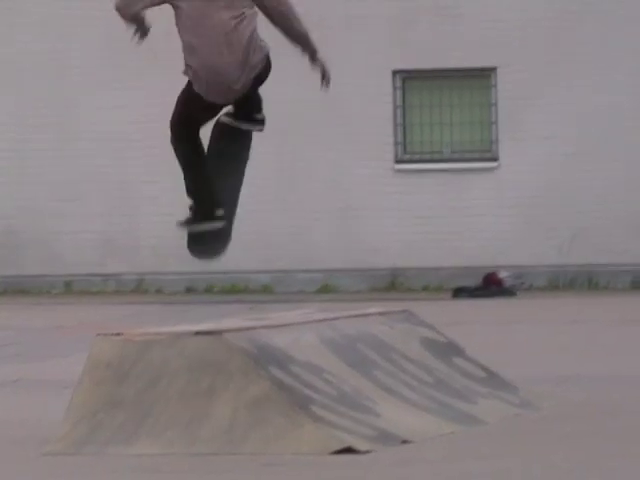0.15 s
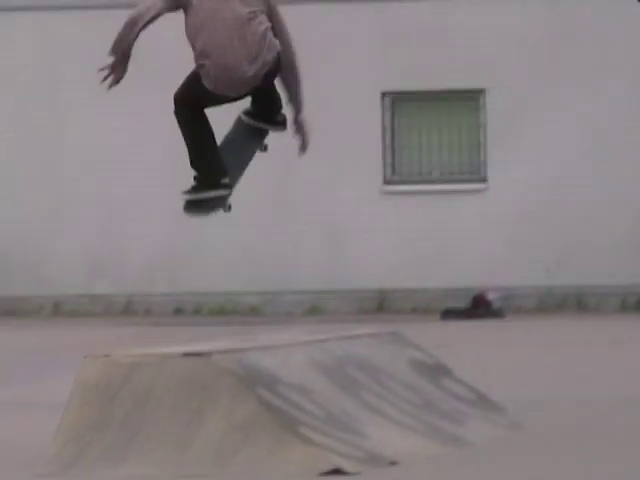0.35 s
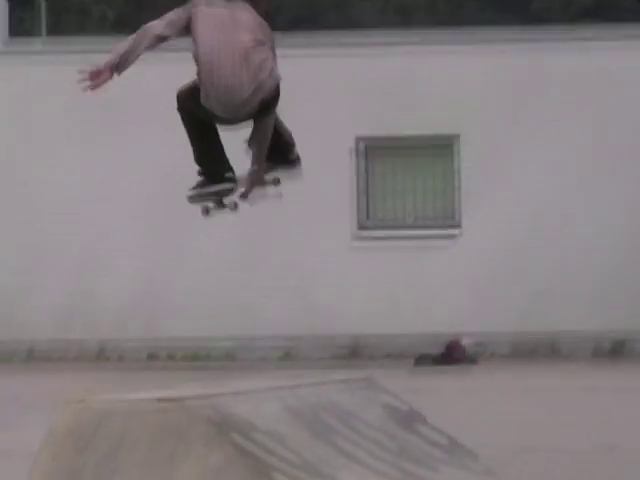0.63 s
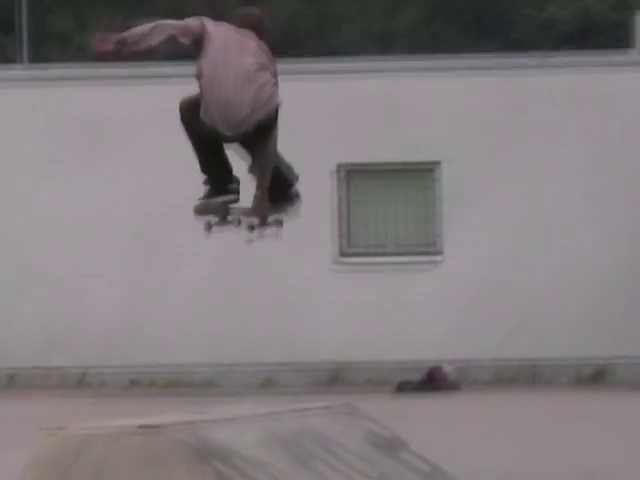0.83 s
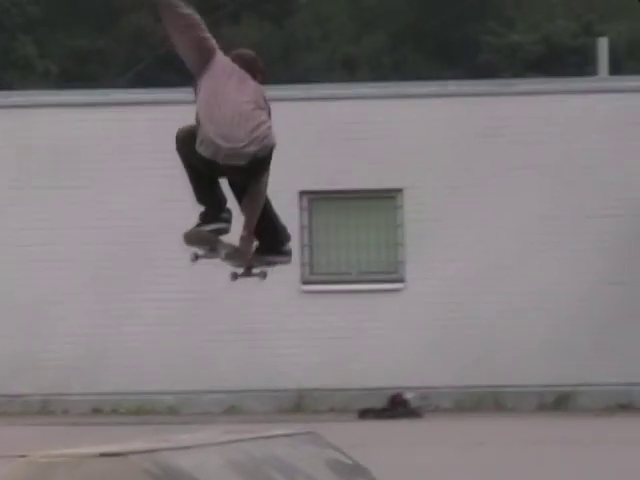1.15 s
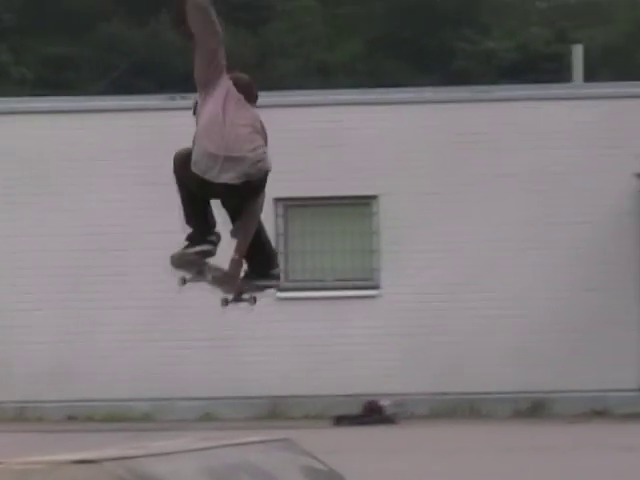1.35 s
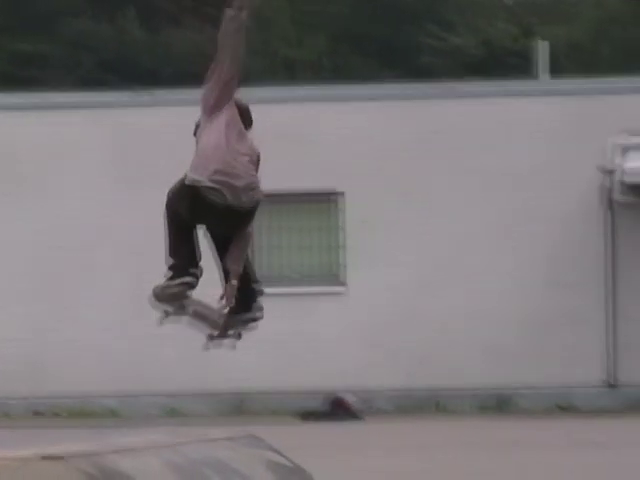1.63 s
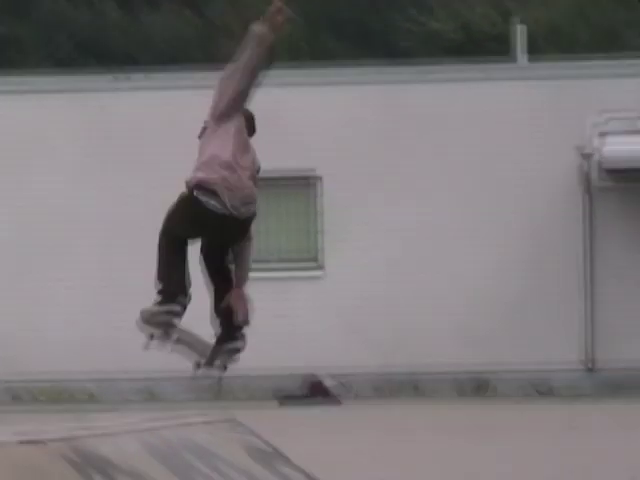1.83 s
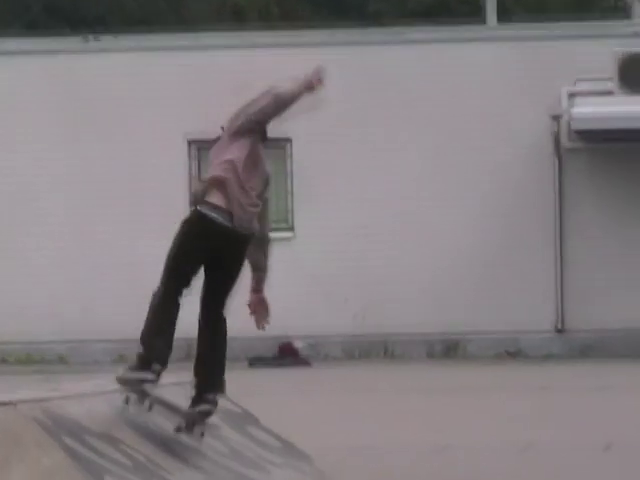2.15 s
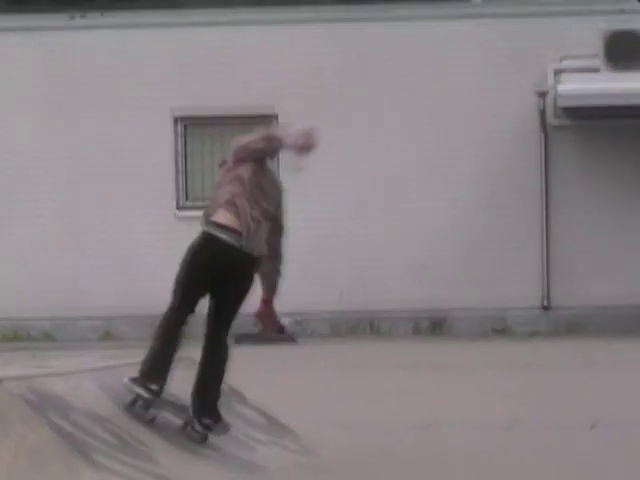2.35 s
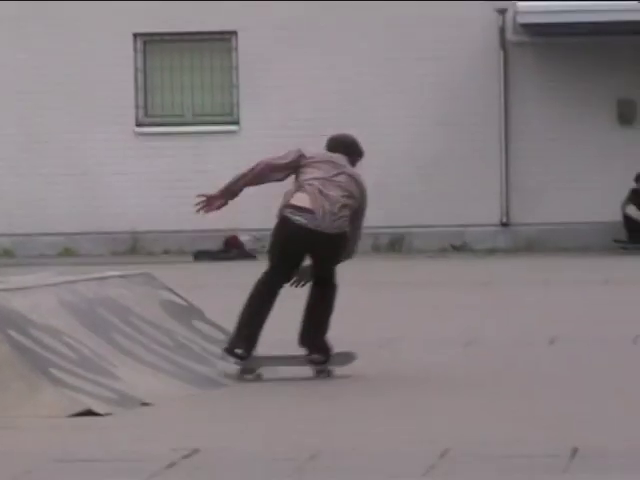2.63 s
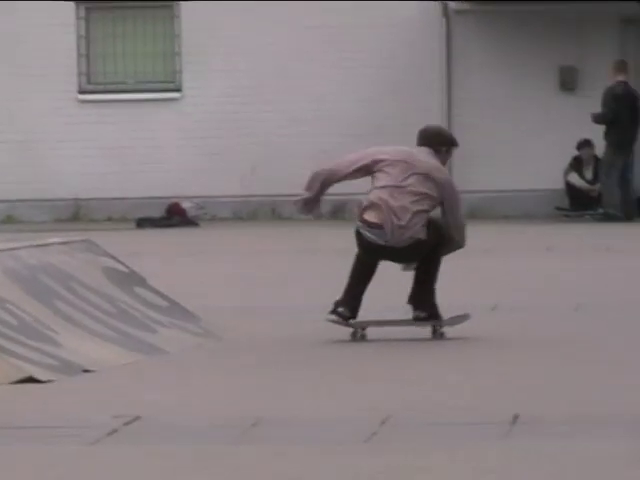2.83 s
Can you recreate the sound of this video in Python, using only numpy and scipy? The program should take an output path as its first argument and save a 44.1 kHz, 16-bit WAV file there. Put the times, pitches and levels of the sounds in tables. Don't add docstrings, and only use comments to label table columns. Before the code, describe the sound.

A skateboard in slow motion, close and loud: low dull rumble, hard wooden clacks, heavy thumps and loose metal rattles, overloading at the peaks, then abruptly quiet far rolling with light clicks in an open paved yard.

```python
import sys
import numpy as np
from scipy import signal
from scipy.fft import rfft, irfft, next_fast_len
from scipy.io import wavfile
from scipy.ndimage import map_coordinates

SR = 44100
rng = np.random.default_rng(int(sys.argv[2]) if len(sys.argv) > 2 else 0)


def generate_wav(sig):
    pcm = np.round(np.clip(np.atleast_2d(sig).T, -1, 1) * 32767).astype(np.int16)
    wavfile.write(sys.argv[1], SR, pcm)


def gain_from_db(level_db):
    decades = np.asarray(level_db, float) / 20
    return 10 ** decades


N = 132300


def unit(x):
    return x / np.sqrt(np.mean(x ** 2) + 1e-20)


def along(points, hz):
    f, v = np.transpose(points)
    return np.interp(np.log(hz + 1), np.log(f + 1), v)


def curves(rows):
    s, *columns = np.transpose(rows)
    return [np.interp(np.arange(N) / SR, s, column) for column in columns]


def wobble(rate):
    knots = rng.standard_normal(int(N * 200 / SR) + 4)
    return map_coordinates(knots, [np.arange(N) * min(rate, 200) / SR])


def filtered(x, response):
    n = x.shape[-1]
    m = next_fast_len(n + 8192)
    return irfft(rfft(x, m) * response(np.fft.rfftfreq(m, 1 / SR)), m)[..., :n]


def body(modes):
    def response(f):
        total = 0
        for k, (hz, width, db) in enumerate(modes):
            damping = 1j * f * width
            total = total + (-1) ** k * gain_from_db(db) * damping / (hz * hz - f * f + damping)
        return total
    return response


def rush(spectrum, alike, gritty_db):
    pair = rng.standard_normal((2, N)) * gain_from_db(gritty_db * wobble(150))

    def mid_side(hz):
        turn = np.arccos(np.clip(along(alike, hz), -1, 1)) / 2
        return gain_from_db(along(spectrum, hz)) * np.array([np.cos(turn), np.sin(turn)])
    mid, side = filtered(pair, mid_side)
    return unit(np.array([mid + side, mid - side]))


def burst(response, t60, rise_s, push=1):
    t = np.arange(SR // 2) / SR
    push_level = 2.65 * push * np.sqrt(0.00023 / rise_s)
    first = push_level * np.exp(1 - t / rise_s) * t / rise_s
    scrape_rise_s = 1 / SR if push else rise_s
    scrape = rng.standard_normal(len(t)) * gain_from_db(-60 * t / t60) * (1 - np.exp(-t / scrape_rise_s))
    x = filtered(first + scrape, response) * gain_from_db(-30 * t / t60)
    return x / np.sqrt(np.mean(x[:SR // 50] ** 2))


def add(track, s, x):
    track[round(s * SR):][:len(x)] += x


def lean_left(x, db):
    return x * gain_from_db([[db / 2], [-db / 2]])


METAL_LEFT_DB = 5.5

# start_s [s], load_db [dB], grit_db [dB]
ROLL = [(0, -18.5, -38.5), (.2, -17, -37.5), (.4, -14.5, -41), (.58, -13.5, -37.5), (.72, -18.5, -38),
        (.88, -18.5, -39), (.97, -18.5, -33), (1.1, -20, -39.5), (1.3, -16.5, -36.5), (1.47, -16, -38),
        (1.78, -16, -40), (1.93, -21, -43.5), (2.03, -14, -41), (2.12, -17.5, -36.5), (2.25, -17, -36.5),
        (2.34, -13, -37), (2.43, -22, -36), (2.52, -10, -35.5)]
# pitch_hz [Hz], level_db [dB per Hz]
RUMBLE = [(15, -38), (25, -10.5), (85, -1.5), (165, -5), (210, -2), (292, -9), (377, -13), (502, -13.5),
          (900, -26), (1170, -24), (1980, -120)]
# pitch_hz [Hz], level_db [dB per Hz]
GRIT = [(350, -31.5), (600, 0.5), (1120, -7), (1610, -5.5), (2200, -14), (3150, -20), (3700, -24.5),
        (4200, -33)]
# pitch_hz [Hz], left_right_likeness [-1..1]
NEAR_ALIKE = [(60, 1), (160, 1), (400, 0.88), (1040, 0.93), (2700, 0.2)]


def wheels():
    load_db, grit_db = curves(ROLL)
    shared = wobble(17.0)
    rumble_lumps = gain_from_db(1.9 * shared + 0.42 * wobble(40))
    rumble = unit(rumble_lumps * rush(RUMBLE, NEAR_ALIKE, gritty_db=-0.5))
    grit_lumps = gain_from_db(1.1 * shared + 0.59 * wobble(30.35))
    grit = unit(grit_lumps * rush(GRIT, NEAR_ALIKE, gritty_db=1.5))
    buzz = filtered(grit, lambda hz: 1 / (1 + (hz / 2000) ** 6))
    hiss = grit - buzz
    buzz_db = (load_db + grit_db) / 2 - 5.5
    hiss_db = 2.2 * (grit_db + 36.5) - 30
    bright = gain_from_db(buzz_db) * buzz + gain_from_db(hiss_db) * hiss
    return gain_from_db(load_db) * rumble + lean_left(bright, METAL_LEFT_DB)


# start_s [s], end_s [s], pitch_hz [Hz], width_hz [Hz], level_db [dB]
SINGS = [(.0, 0.259, 533, 247, -32), (0.307, 0.602, 424, 206, -27.5), (.67, 0.877, 2237, 122, -53.5),
         (1.002, 1.382, 2200, 110, -48), (0.993, 1.498, 1097, 196, -42.5), (1.534, 1.856, 1050, 172, -38.5),
         (1.635, 1.684, 588, 289, -24), (1.85, 1.932, 734, 246, -26.5), (2.081, 2.337, 377, 180, -26.5),
         (2.123, 2.351, 763, 218, -29), (2.08, 2.323, 3000, 900, -49.5), (2.45, 2.517, 1505, 700, -31),
         (2.352, 2.41, 1110, 1210, -20)]


def singing():
    t, out = np.arange(N) / SR, np.zeros((2, N))
    for start, end, hz, width, db in SINGS:
        gate = np.clip(np.minimum(t - start, end - t) / 0.008 + .5, 0, 1)
        noise = rng.standard_normal(N) + 0.21 * rng.standard_normal((2, N))
        stones = gain_from_db(4 * wobble(45.33)) * noise
        ring = body([(hz, width, 0)])
        out += gain_from_db(db) * gate * unit(filtered(stones, lambda f: ring(f) ** 2))
    return out


# start_s [s], deck_clack_db [dB], ground_thump_db [dB], edge_crack_db [dB], t60_s [s]
BLOWS = [(.288, -34, -31, -46, 0.06), (0.502, -47, -37, -32.5, 0.28), (.628, -0.5, -8.5, -10, 0.088),
         (0.9, -21.5, -3, -23.5, 0.29), (.986, -21, -5.5, -26, 0.13), (1.272, -27.5, -14, -31, 0.11),
         (1.515, -8, -12, -26, 0.16), (1.543, -15, -18, -32, 0.036), (1.644, -22.5, -10, -40, 0.11),
         (1.824, -7, -12, -28.5, 0.19), (1.856, -13, -18.5, -42.5, 0.074), (1.948, -14.5, -10, -31, 0.21),
         (2.051, -11.5, -0.5, -10.5, 0.12), (2.283, -20, -36, -38.5, 0.11),
         (2.353, -14.5, 1.5, -19.5, 0.16), (2.378, -11, -2.5, -18.5, 0.046), (2.39, -8, -4.5, -26.5, 0.16),
         (2.405, -16.5, -2, -35, 0.064), (2.455, -19.5, -10, -24.5, 0.11),
         (2.476, -14.5, -14, -24.5, 0.094), (2.496, -19, -43, -24.5, 0.043)]
# pitch_hz [Hz], width_hz [Hz], level_db [dB]
DECK = [(368, 26.3, 4.5), (492.5, 52.6, 6), (560, 20, 8), (623, 29, 1), (723, 41, 4.5), (878, 220, -9.5),
        (1290, 61, -7.5)]
# pitch_hz [Hz], width_hz [Hz], level_db [dB]
GROUND = [(72, 52, -6), (91.9, 21.6, 4.5), (173, 35.3, 2), (214.8, 37.6, 2.5), (304.5, 58, -2.5)]
# pitch_hz [Hz], level_db [dB]
EDGE = [(700, 2), (1400, -5), (1900, -3), (2500, -14), (3300, -16.5), (4200, -32.5)]


def blows():
    wood, metal = np.zeros(N + SR), np.zeros(N + SR)
    for s, clack_db, thump_db, crack_db, t60 in BLOWS:
        clack = burst(body(DECK), 1.8 * t60, rise_s=0.00011)
        thump = burst(body(GROUND), 1.6 * t60, rise_s=0.00086)
        crack = burst(lambda hz: gain_from_db(along(EDGE, hz)), 1.2 * t60, rise_s=0.0016, push=0)
        add(wood, s, gain_from_db(clack_db) * clack + gain_from_db(thump_db) * thump)
        add(metal, s, gain_from_db(crack_db + 1.5) * crack)
    return wood[:N], metal[:N]


# start_s [s], pitch_hz [Hz], level_db
# [dB peak], t60_s [s]
KNOCKS = [(.2861, 643, 4.5, 0.023), (.3205, 606, -7, 0.023), (.9015, 205.7, -2, 0.091),
          (1.5158, 653, 5, 0.023), (1.9468, 270, 4, 0.062), (2.352, 189, -4, 0.038), (2.387, 225, 9, 0.11),
          (1.836, 549, -3, 0.24), (2.7, 1650, -8, 0.026), (2.37, 201, 2.5, 0.088), (.505, 88, -7, 0.34),
          (.2915, 455, -0.5, 0.033), (1.4956, 1980, -17.5, 0.027), (1.52, 201.2, 4, 0.14),
          (1.5285, 670, -4, .03), (1.532, 203, 1, 0.069), (1.5435, 570, -1.5, 0.026), (1.823, 209.5, 3, .1),
          (1.829, 833, -2, 0.047), (1.829, 1376, -6, 0.03), (2.348, 68.3, -7.5, 0.21),
          (2.418, 61.3, -0.5, .15), (2.494, 360.5, -4, 0.11),
          (0.1167, 1470, -17, 0.018), (0.1468, 3280, -44, 0.028), (.2867, 1920, -19.5, 0.012),
         (0.287, 4380, -19, 0.011), (0.3195, 1295, -26.5, 0.043), (0.385, 1700, -24, .04),
         (0.393, 904, -14.5, 0.037), (.42, 483, -8, 0.039), (.451, 567, -16.5, 0.024),
         (.564, 329, -10.5, 0.065), (.7422, 2247, -30, 0.065), (1.0396, 2560, -35, .05),
         (1.187, 328, -5.5, 0.031), (1.3174, 2170, -31, .08), (1.616, 1687, -29, 0.08),
         (1.635, 556, -14.5, .05), (1.65, 366, -7, 0.072), (1.962, 693, -11.5, 0.11),
         (2.062, 377.6, 0.5, 0.083), (2.174, 810, -19, 0.11), (2.285, 450, -22, 0.043),
         (2.47, 319, 1, 0.025), (2.4753, 1330, -12, 0.049), (2.4998, 1490, -15, 0.046)]


def knocks():
    out, t = np.zeros(N + SR), np.arange(SR // 5) / SR
    for s, hz, db, t60 in KNOCKS:
        envelope = gain_from_db(db - 60 * t / t60) * (1 - np.exp(-t * hz * 2))
        add(out, s, envelope * np.sin(2 * np.pi * hz * t))
    return out[:N]


def tail_pop():
    out, t = np.zeros(N + SR), np.arange(SR // 5) / SR
    sweep_hz, sweep_s = 2890, .0012
    turns = 400 * t + sweep_hz * sweep_s * (1 - np.exp(-t / sweep_s))
    envelope = gain_from_db(8 - 60 * t / 0.054) * (1 - np.exp(-t / 0.0014))
    add(out, .6246, envelope * np.sin(2 * np.pi * turns))
    return out[:N]


# start_s [s], level_db [dB peak], t60_s [s]
RATTLES = [(0.117, -39, 0.04), (0.1458, -27, 0.05), (0.261, -37, 0.057), (0.2867, -31, 0.02),
           (0.387, -43.5, 0.11), (0.4622, -41, 0.1), (0.6774, -22, 0.09), (0.6943, -23, 0.15),
           (0.7411, -26.5, 0.07), (0.7691, -25.5, 0.13), (0.8799, -49, 0.062), (1.0403, -23.5, 0.18),
           (1.1078, -26.5, 0.13), (1.1762, -22.5, 0.051), (1.1914, -23.5, 0.059), (1.2288, -32, 0.051),
           (1.2717, -21.5, 0.087), (1.3191, -27.5, 0.18), (1.4647, -36.5, 0.097), (1.4955, -18, 0.06),
           (1.6152, -30, 0.049), (.9877, -11, 0.075), (1.902, -46, 0.14), (2.0033, -46.5, 0.052),
           (2.0864, -19, 0.15), (2.1804, -32, 0.11), (2.2867, -37, 0.066)]
# pitch_hz [Hz], width_hz [Hz], level_db [dB]
TRUCKS = [(650, 126, 7.5), (1890, 370, -1.5), (2200, 103, 4), (3000, 540, -6)]


def rattles():
    out = np.zeros(N + SR)
    for s, db, t60 in RATTLES:
        add(out, s, gain_from_db(db - 9) * burst(body(TRUCKS), t60, rise_s=0.00097, push=0))
    return out[:N]


def wall(x):
    t, t60 = np.arange(SR // 2) / SR, 0.066
    tail = rng.standard_normal((2, len(t))) * gain_from_db(-60 * t / t60) * (1 - np.exp(-t / 0.01))
    return signal.fftconvolve(x[None], tail / np.linalg.norm(tail[0]), axes=1)[:, :N]


def slowed(x):
    x = filtered(x, lambda hz: 1 / np.sqrt(1 + (hz / 4100) ** 16))
    slow_rate = 9600
    t, knots = np.arange(N) / SR, np.arange(N * slow_rate // SR + 1) / slow_rate
    return np.array([np.interp(t, knots, map_coordinates(side, [knots * SR])) for side in x])


# pitch_hz [Hz], left_right_likeness [-1..1]
FAR_ALIKE = [(60, 0.82), (210, 0.99), (760, 0.91), (2700, 0.97)]
# start_s [s], level_db [dB]
FAR = [(2.54, -43), (2.622, -41.5), (2.632, -36), (2.658, -39.5), (2.672, -36.5), (2.692, -43.5),
       (2.936, -41.5), (3.0, -44)]
# pitch_hz [Hz], level_db [dB per Hz]
YARD = [(40, -21), (110, -8), (211, -1), (717, -4.5), (1400, -13.5), (3150, -24.5), (6000, -36),
        (8000, -59), (14000, -62.5)]


def far_rolling():
    level_db, = curves(FAR)
    uneven = gain_from_db(1.5 * wobble(35)) * rush(YARD, FAR_ALIKE, gritty_db=1.5)
    return gain_from_db(level_db) * unit(uneven)


# start_s [s], level_db [dB peak]
CLICKS = [(2.585, -41), (2.629, -34), (2.6439, -36), (2.7601, -33), (2.8529, -39), (2.9412, -29)]
# start_s [s], level_db [dB], t60_s [s]
FAR_THUD = (2.627, -46, .15)


def far_clicks():
    clicks = np.zeros(N + SR)
    joint = body([(670, 500, 13), (1920, 630, -2.0), (3080, 460, -20)])
    for s, db in CLICKS:
        add(clicks, s, gain_from_db(db - 14) * burst(joint, .04, rise_s=.0005, push=0))
    s, db, t60 = FAR_THUD
    add(clicks, s, gain_from_db(db) * burst(body([(114, 22, 6.5), (210, 58, 19)]), t60, rise_s=0.00097))
    return filtered(clicks[:N], lambda hz: 1 / (1 + (hz / 3800) ** 4))


# start_s [s], pitch_hz [Hz], level_db [dB peak]
FAR_TICKS = [(2.548, 10800, -67), (2.6425, 1710, -42.5), (2.76, 1950, -44), (2.948, 11000, -60),
             (2.984, 11500, -60.5)]


def far_pebbles():
    ticks, t = np.zeros(N + SR), np.arange(SR // 50) / SR
    for s, hz, db in FAR_TICKS:
        add(ticks, s, gain_from_db(db - 60 * t * hz / 45) * np.sin(2 * np.pi * hz * t))
    return ticks[:N]


# pitch_hz [Hz], level_db [dB per Hz]
AIR = [(1500, -30), (3500, -1), (6000, 2), (7500, -10), (12000, -20), (13200, -120)]


def yard_air():
    return gain_from_db(-65.5) * rush(AIR, FAR_ALIKE, gritty_db=.5)


def scene():
    wood, metal = blows()
    wood = wood + knocks()
    metal = metal + tail_pop() + rattles()
    hits = wood + lean_left(metal, METAL_LEFT_DB)
    near = wheels() + singing() + hits + gain_from_db(-14) * wall(wood + metal)
    near = lean_left(near, -6)
    far = lean_left(far_rolling() + far_clicks() + far_pebbles() + yard_air(), -5.5)
    after = np.clip((np.arange(N) / SR - 2.5195) / .001, 0, 1)
    return slowed(near) * (1 - after) + far * after


def low_pass(x):
    return signal.sosfilt(signal.butter(12, 14600, fs=SR, output="sos"), x)


def record(dry):
    clipped = dry / (1 + np.abs(dry) ** 14) ** (1 / 14)
    return low_pass(clipped)


dry = scene()
out = record(dry)
generate_wav(out)
```